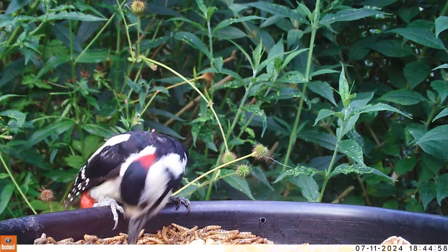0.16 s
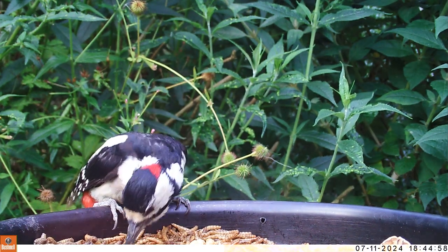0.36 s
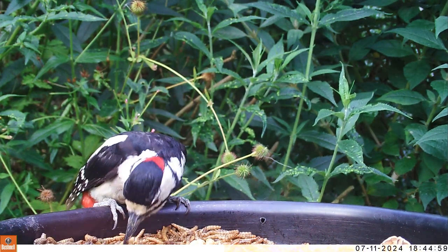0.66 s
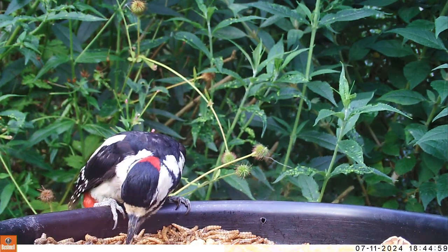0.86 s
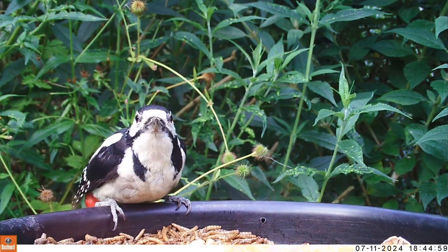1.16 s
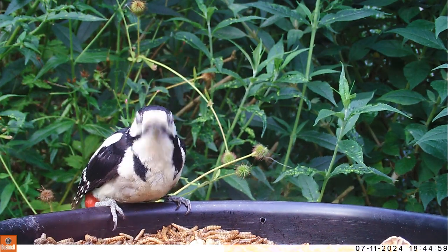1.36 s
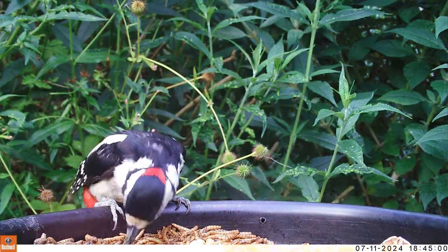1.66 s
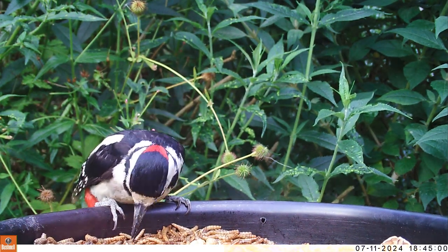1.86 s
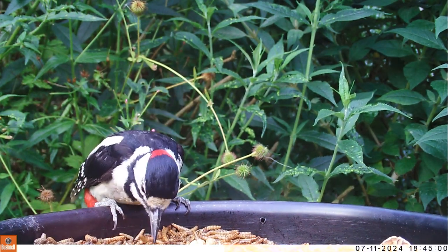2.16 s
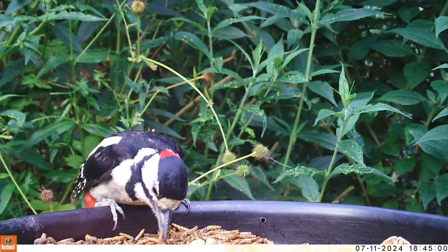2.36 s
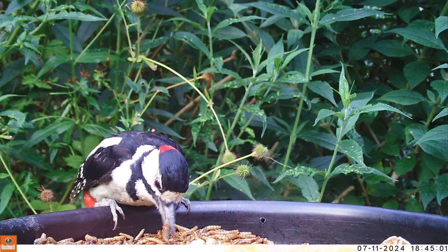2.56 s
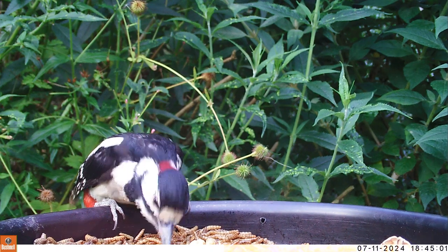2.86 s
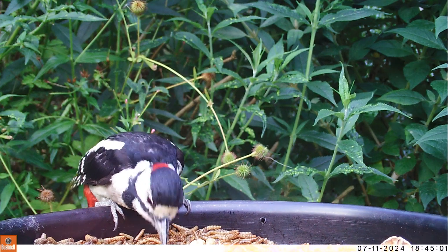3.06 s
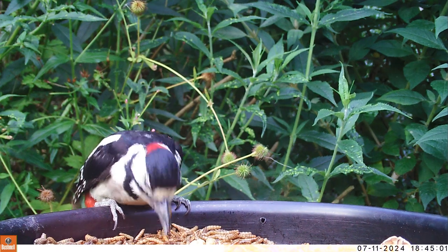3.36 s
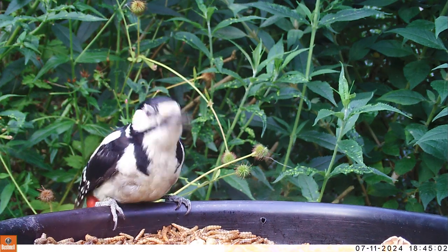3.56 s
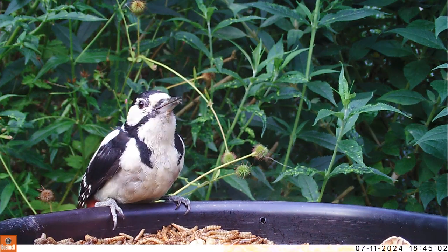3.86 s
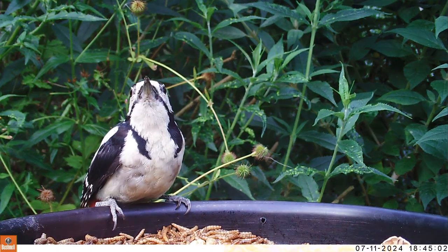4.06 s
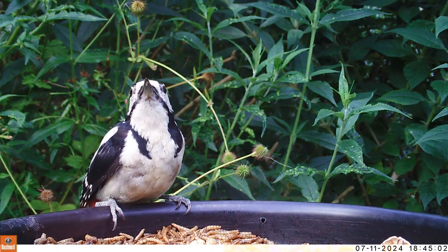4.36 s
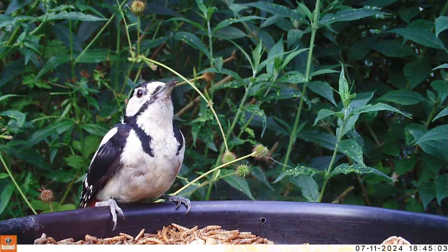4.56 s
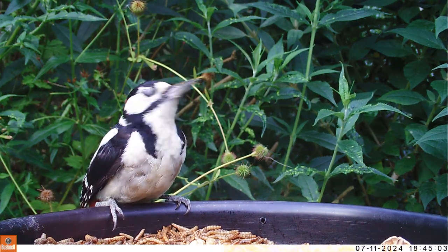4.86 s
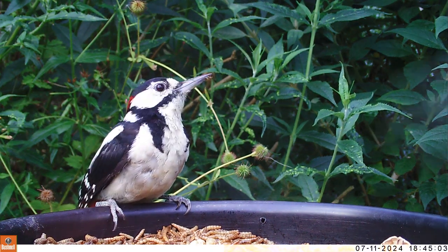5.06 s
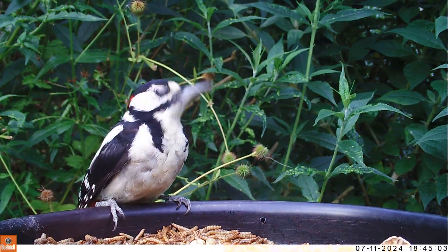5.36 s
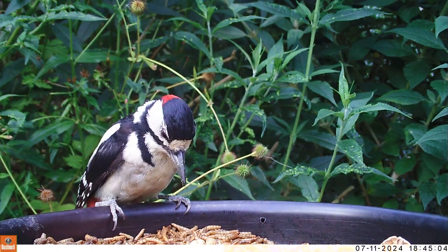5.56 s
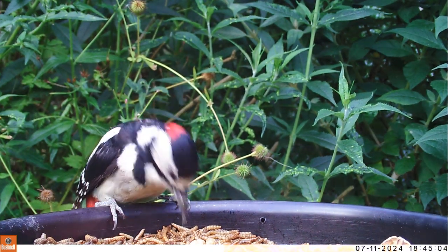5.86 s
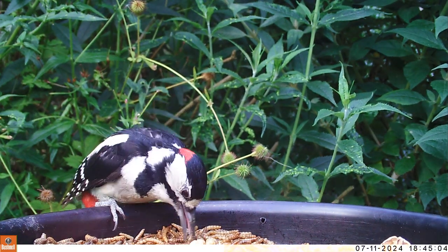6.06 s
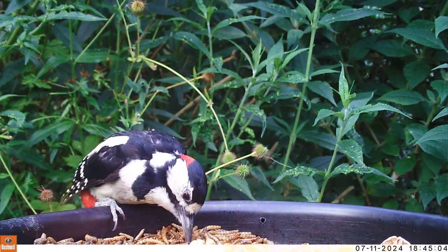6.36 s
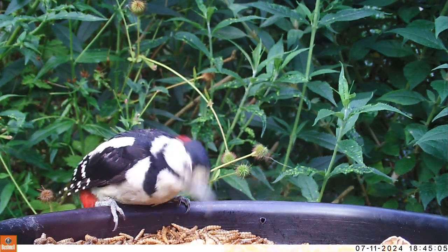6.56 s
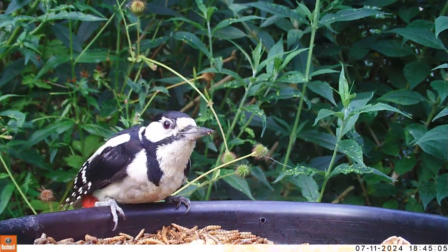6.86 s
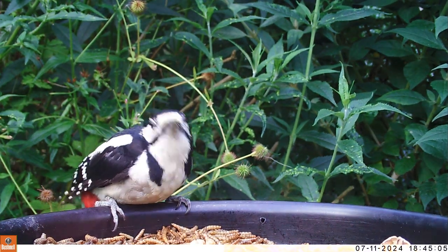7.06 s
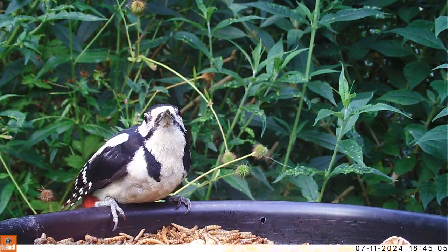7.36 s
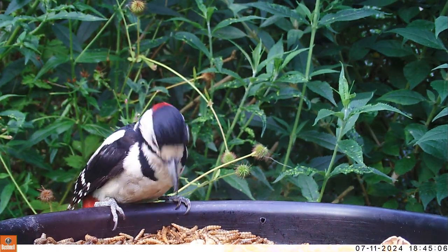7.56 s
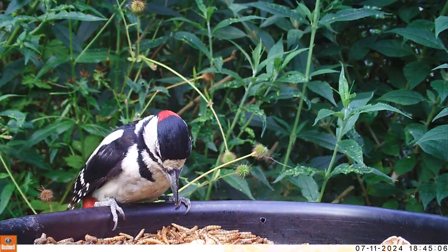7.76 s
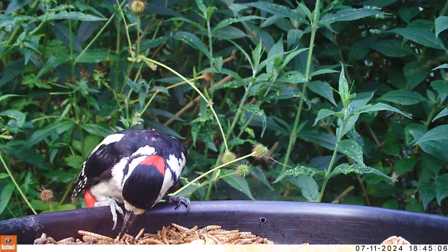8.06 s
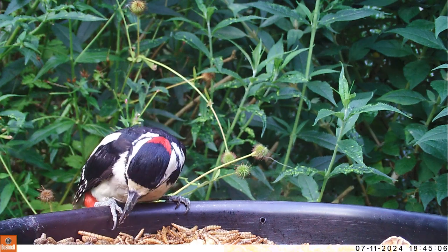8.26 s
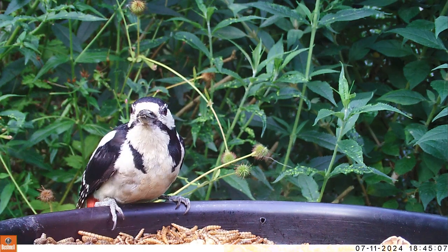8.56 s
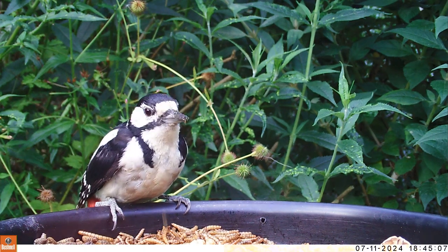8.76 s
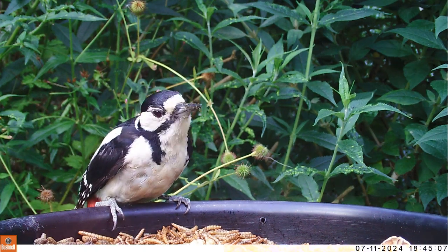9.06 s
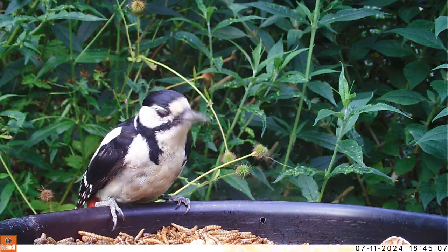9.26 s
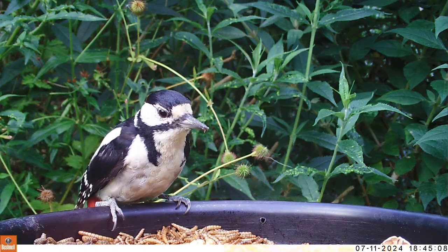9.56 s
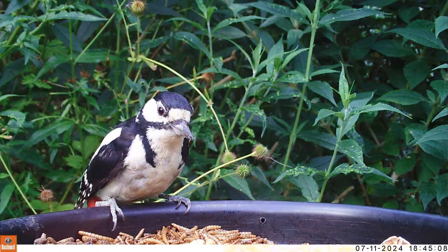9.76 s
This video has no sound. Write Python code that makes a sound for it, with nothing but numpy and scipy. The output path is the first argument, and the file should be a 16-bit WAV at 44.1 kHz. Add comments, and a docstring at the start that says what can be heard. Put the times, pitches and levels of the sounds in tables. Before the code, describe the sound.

A steady low outdoor rumble with faint hiss runs throughout. In the first second, right at the microphone, a woodpecker pecks and crunches dried mealworms in a plastic tray, and the feeder gives several soft, deep thumps. Feathers and claws rustle until about 1.5 seconds, and a distant songbird gives a few faint calls. Sparse light pecks and quiet rummaging follow until about 3.4 seconds. After a lull, rustling and thumps return near 4.8 seconds, and from 5.1 to 5.6 comes a quick flurry of knocks and brittle snaps, some briefly ringing the tray floor. Lighter pecks follow, with another sharp tray tap at 6.6 and a single knock at 8. From about 7.3 seconds to the end near 10, a small songbird sings further off in the bushes: four soft buzzes, then louder thin, high whistles and buzzy trills with a slight echo.

```python
"""A woodpecker picks dried mealworms from a plastic feeding tray, right at the microphone of a small
camera fixed to it. Its bill knocks, crunches the brittle food and now and then rings the tray floor.
Just as close, feathers and claws rustle, and the feeder thumps softly as the bird shifts its weight.
Further off among the bushes a small songbird whistles and buzzes, over a low outdoor rumble."""
import sys
import numpy as np
from scipy import signal
from scipy.fft import rfft, irfft
from scipy.io import wavfile

SR = 44100
rng = np.random.default_rng(int(sys.argv[2]) if len(sys.argv) > 2 else 0)


def unload_audio(sound):
    """Save the sound as a 16-bit wav file, at the path given as the first command line argument."""
    columns = np.transpose(np.atleast_2d(sound))
    # keep every value between -1 and 1, then stretch to whole-number steps
    steps = np.round(np.clip(columns, -1, 1) * 32767)
    wavfile.write(sys.argv[1], SR, steps.astype(np.int16))


N = 437031


# Pecks right at the microphone: start_s, length_s, level_db, crunch_relative_db, snap_relative_db
PECKS = [(0.318, .002, -48.5, -10, -6), (0.385, 0.032, -51.5, -3, -6), (0.398, 0.012, -46, -4.5, -5.5),
         (0.41, 0.015, -52, 5, -12), (0.502, 0.018, -56, -2, -6.5), (0.819, 0.0049, -66, -2, -10),
         (1.76, 0.0031, -47, -24, -11.5), (2.079, .003, -62, -8.5, -6), (2.104, .003, -60.5, -11, -10),
         (2.207, 0.0023, -51.5, -6.5, -33.5), (2.514, .003, -64.5, -4, -19), (2.95, 0.005, -58, -4, -10),
         (3.106, 0.0095, -57, -2.5, -11.5), (3.29, 0.0044, -64.5, -19, -13),
         (4.839, 0.0058, -59, -18, -9.5), (5.129, 0.00058, -44, -11, -14), (5.221, 0.0085, -48.5, -3, 0.5),
         (5.263, 0.0082, -45.5, -7, -2), (5.27, 0.0042, -45, -1, -16), (5.33, .0033, -52, -0.5, 3),
         (5.342, 0.0091, -49.5, -0.5, 1.5), (5.364, 0.0067, -43.5, -8.5, -6),
         (5.393, 0.0027, -41, -5.5, -7), (5.4, 0.0051, -50.5, -3.5, -1), (5.477, 0.009, -62.5, 0, 0.5),
         (5.545, 0.0036, -37.5, -16, -13), (5.562, .0066, -58.5, 3.5, -1), (5.58, 0.0045, -57.5, -3, 3),
         (5.592, 0.0026, -56, -5, -5), (5.628, 0.0019, -61.5, -5, 2.5), (6.014, 0.026, -61.5, -6.5, -11),
         (6.065, 0.0048, -61, 1, -9), (6.396, 0.0024, -43, -33.5, -20), (6.437, .003, -58.5, -20, -21),
         (6.57, 0.00212, -55.5, -7, -8), (6.635, 0.0079, -47, 0.5, -2.5),
         (8.044, 0.0026, -43.5, -28, -13.5), (9.055, 0.0025, -67, -6, 1)]

def pecks(bare_below_db=-20, graze_lead_s=0.01):
    """The bill strikes the heap; where it catches little food, a light graze comes before the knock."""
    out = np.zeros(N)
    for start, length, db, crunch_db, snap_db in PECKS:
        add(out, start, bill_contact(length, db, crunch_db, snap_db))
        if crunch_db < bare_below_db:
            add(out, start - graze_lead_s, bill_contact(length, db - 11, crunch_db=-5.5, snap_db=-6))
    return out


# Spectra of the bill's hard knock, the heap's dull crunch and the food's snap: frequency_hz, gain_db
KNOCK_SPECTRUM = [(1500, -33.5), (2500, -23.5), (3100, -15), (3650, -6), (4100, 0), (4500, -12.5),
                  (5100, -23.5), (6500, -37)]
CRUNCH_SPECTRUM = [(400, -28), (800, -12.5), (1300, -8), (1620, -1.5), (1820, -0.5), (2000, -5.5),
                   (2250, -4), (2600, 6.5), (3000, 7), (3600, -11.5), (5000, -37)]
SNAP_SPECTRUM = [(3500, -46), (5200, -10.5), (6100, -7), (7000, 3), (7600, 2), (8200, -4), (9300, -0.5),
                 (10300, -6), (11700, 0), (12600, -9), (14000, -4.5)]

def bill_contact(length, db, crunch_db, snap_db, grit=0.63, settle_s=0.025, crisp_db=-8, size=4096):
    """A brief run of fractures under the bill drives a hard knock, a dull crunch and a bright snap."""
    t = np.arange(size) / SR
    # softer food snaps less and knocks a little lower
    softening = np.exp(0.0034 * min(snap_db - crisp_db, 0))
    knock = [(hz * softening, gain) for hz, gain in KNOCK_SPECTRUM]
    # the food gives way while the bill presses; longer pushes die away more slowly
    rise = np.minimum(t / (0.16 * length), 1)
    press = np.exp(-np.maximum(t - 0.7 * length, 0) / (0.0011 + 0.3 * length))
    loose_pieces = amp(-22) * np.exp(-t / settle_s)
    force = rise * (press + loose_pieces)
    fractures = force * rng.standard_normal(size) * np.exp(grit * wander(size, 1900))
    out = 0
    for spectrum, gain_db in ((knock, 0), (CRUNCH_SPECTRUM, crunch_db - 1), (SNAP_SPECTRUM, snap_db)):
        sound = signal.fftconvolve(fractures, response(spectrum))
        out += amp(gain_db) * unit_energy(sound)
    return amp(db) * np.sqrt(length * SR) * out


# The bill rummaging in the heap, close up: start_s, length_s, gap_s, level_db
STIRS = [(0.279, .11, 0.092, -66.5), (0.426, .065, .011, -63.5), (2.224, .03, .02, -73),
         (2.663, .7, .11, -77), (5.23, .02, .012, -63), (5.297, .03, .012, -59), (5.824, .06, 0.022, -68),
         (6.585, .02, 0.018, -64)]

def stirs(contact_s=0.0066, jitter_s=0.0015, spread_db=3, max_contacts=8):
    """Small contacts follow each other unevenly while the bill stirs the mealworms."""
    out = np.zeros(N)
    for start, length, gap, db in STIRS:
        for k, (late, strength) in enumerate(rng.standard_normal((max_contacts, 2))):
            sound = bill_contact(contact_s, db + spread_db * strength, crunch_db=1, snap_db=-5)
            if k * gap < length:
                add(out, start + k * gap + jitter_s * late, sound)
    return out


# Modes of the plastic tray: pitch_hz, gain_db, t60_s
TRAY_MODES = [(880, 0, 0.034), (1100, -3, 0.039), (1560, -4, 0.055), (1690, -2, 0.045), (2300, -15, .025),
              (2663, -16, 0.025), (2930, 0, .022), (4540, -5, 0.012)]
# The bill striking through to the tray floor: start_s, peak_db
TRAY_TAPS = [(0.403, -61), (5.226, -44.5), (5.272, -52), (5.395, -54), (5.546, -38.5), (5.563, -49),
             (6.6396, -40.5)]

def tray_taps(spread_db=2):
    """The tray rings briefly; each spot struck excites its modes in other proportions."""
    t, out = np.arange(SR // 10) / SR, np.zeros(N)
    modes = np.array([amp(db - 60 * t / t60) * np.sin(2 * np.pi * hz * t) for hz, db, t60 in TRAY_MODES])
    for start, db in TRAY_TAPS:
        signs = rng.choice([-1, 1], len(modes))
        weights = signs * amp(spread_db * rng.standard_normal(len(modes)))
        ring = weights @ modes
        add(out, start, amp(db) * ring / abs(ring).max())
    return out


# Feathers and claws on the tray, beside the microphone: start_s, length_s, relative_db
RUSTLES = [(0.03, 0.097, -73.5), (0.153, 0.51, -69.5), (0.875, 0.19, -67.5), (0.997, 0.095, -64),
           (1.128, 0.17, -64.5), (1.313, 0.13, -68), (1.436, .12, -69.5), (2.996, 0.195, -77),
           (4.753, 0.205, -70.5), (4.867, 0.18, -67), (5.085, 0.087, -62), (5.212, .18, -62),
           (5.476, 0.09, -62), (5.93, 0.2, -73), (6.35, 0.33, -76)]
# Spectrum of that brushing: frequency_hz, gain_db
RUSTLE_SPECTRUM = [(300, -15), (900, -8), (1600, -11), (2200, -14), (3100, -13), (3950, 2.5), (4500, -6.5),
                   (5400, -17.5), (7500, -22), (9000, -18), (10300, -19.5), (11900, -10.5), (14000, -29)]

def rustle(ticks_per_s=4500, stroke_hz=36, scratch_hz=200, attack_s=0.019, release_s=0.05, gain_db=1):
    """Feathers and claws brush in short overlapping strokes, each a clump of tiny ticks."""
    t, power = np.arange(N) / SR, np.zeros(N)
    for start, length, db in RUSTLES:
        ramps = np.minimum((t - start) / attack_s, (start + length - t) / release_s)
        power += amp(db) ** 2 * np.clip(ramps, 0, 1)
    pressure = amp(4 * wander(N, stroke_hz) + 2 * wander(N, scratch_hz))
    ticks = sparse_noise(N, ticks_per_s) * pressure
    brushing = signal.oaconvolve(ticks, response(RUSTLE_SPECTRUM))[:N]
    return amp(gain_db) * np.sqrt(power) * unit_rms(brushing)


# Soft thumps of the feeder that carries the microphone: start_s, level_db, sway_hz
THUMPS = [(.215, -32.5, 28), (.295, -35, 22), (0.425, -24, 42), (0.456, -27, 16.4), (.488, -35, 43),
          (4.929, -41.5, 26), (5.097, -29.5, 28.4), (5.33, -37, 22), (5.479, -32.5, 21.3)]

def feeder_thumps(shudder=0.14, shudder_hz=130, unsteadiness=0.13, swell_cycles=0.62):
    """As the bird shifts its weight, the feeder sways unevenly for a cycle or two and shudders."""
    t, out = np.arange(SR // 2) / SR, np.zeros(N)
    for start, db, hz in THUMPS:
        cycles = np.cumsum(hz * (1 + unsteadiness * wander(len(t), 60))) / SR
        sway = np.sin(2 * np.pi * cycles) + shudder * wander(len(t), shudder_hz)
        age = t * hz / swell_cycles
        add(out, start, amp(db) * age * np.exp(1 - age) * sway)
    return out


# Clear whistles and trilled buzzes, off in the bushes: start_s, length_s, onset_hz, held_hz, source_db
WHISTLES = [(0.524, .022, 7700, 7220, -72), (.525, .085, 3300, 2050, -75), (0.857, .1, 2710, 2950, -69.5),
            (3.491, 0.039, 7760, 7120, -72.5), (7.264, 0.051, 5674, 5630, -76),
            (7.954, 0.16, 5530, 4420, -63.5), (8.175, .13, 4390, 4099, -54.5),
            (8.423, 0.19, 7200, 6820, -75.5), (8.656, .14, 4880, 4510, -57), (8.795, .11, 5840, 5541, -66),
            (9.266, 0.17, 3280, 3638, -61), (9.612, .11, 6300, 5730, -69)]
BUZZES = [(8.336, 0.12, 4210, 4085, -62), (8.877, 0.092, 5200, 4280, -62.5),
          (9.182, 0.078, 7250, 6900, -75.5), (9.49, .1, 8200, 7850, -80), (9.761, .097, 6520, 4260, -61),
          (9.84, .09, 6470, 4408, -62)]

def songbird(song_start_s=7.345, gap_s=0.15):
    """A few stray calls, then a song: four soft buzzes that break into whistles and louder buzzes."""
    out = np.zeros(N)
    for k in range(4):
        soft_buzz = song_note(length=0.07, onset_hz=5500, held_hz=4400, db=-73, buzzing=True)
        add(out, song_start_s + k * gap_s, soft_buzz)
    for notes, buzzing in ((BUZZES, True), (WHISTLES, False)):
        for start, *shape in notes:
            add(out, start, song_note(*shape, buzzing))
    return out


def song_note(length, onset_hz, held_hz, db, buzzing, trill_hz=95, quiver_hz=28.1, db_per_octave=-18):
    """A thin whistle slides onto a held pitch; a wide, fast trill turns it into a buzz."""
    progress = np.linspace(0, 1, int(length * SR))
    trill_rate = trill_hz * (1 + 0.28 * wander(len(progress), 54))
    trill = np.sin(2 * np.pi * np.cumsum(trill_rate) / SR)
    slide_share = 0.32 if buzzing else 0.17
    glide_hz = held_hz + (onset_hz - held_hz) * np.exp(-progress / slide_share)
    # a buzz's trill narrows as the note settles; a whistle barely quivers
    depth_hz = 330 + 0.62 * abs(glide_hz - held_hz) if buzzing else quiver_hz
    hz = glide_hz * (1 + 0.0033 * wander(len(progress), 110)) + depth_hz * trill
    # the voice is strongest at the bottom of each sweep
    voice = amp(db_per_octave * np.log2(hz / held_hz)) * np.sin(2 * np.pi * np.cumsum(hz) / SR)
    effort = np.clip(np.minimum(progress / 0.36, (1 - progress) / 0.11), 0, 1)
    return amp(db) * np.sin(np.pi / 2 * effort) ** 2 * unit_rms(voice)


def garden_echo(song, direct_db=-3, leaves_db=-8, leaves_t60_s=0.35, far_db=-4, far_t60_s=1.0):
    """Nearby leaves scatter the song at once; trees and walls return a longer tail."""
    t = np.arange(SR) / SR
    leaves, far = sparse_noise((2, SR), per_s=2000)
    tail = amp(leaves_db) * unit_energy(leaves * amp(-60 * t / leaves_t60_s))
    tail += amp(far_db) * unit_energy(far * amp(-60 * t / far_t60_s))
    return amp(direct_db) * song + signal.fftconvolve(song, tail)[:N]


# Spectrum of the open air around the feeder: frequency_hz, gain_db
AIR_SPECTRUM = [(12, -4.5), (25, 4), (40, -5), (60, -3.5), (80, -9.5), (115, -12.5), (200, -18), (400, -27),
                (800, -34.5), (1300, -38.5), (2300, -45), (3900, -47.5), (6700, -51), (14000, -52.5)]

def outdoor_air(level_db=-51.5, swell_db=0.52, port_hz=3930, port_half_width_hz=240, port_db=7):
    """Distant rumble and hiss swell very slightly; the microphone opening lifts one band of the hiss."""
    hz = np.fft.rfftfreq(N, 1 / SR)
    port_lift_db = port_db / (1 + ((hz - port_hz) / port_half_width_hz) ** 2)
    shape = amp(gain_at(AIR_SPECTRUM, hz) + port_lift_db)
    noise = irfft(rfft(rng.standard_normal(N)) * shape, N)
    return amp(level_db - swell_db * wander(N, 1.2)) * unit_rms(noise)


def amp(db):
    return 10 ** (np.asarray(db) / 20)


def unit_rms(x):
    return x / np.sqrt(np.mean(x ** 2) + 1e-20)


def unit_energy(x):
    return x / np.linalg.norm(x)


def add(mix, start_s, sound):
    part = mix[max(round(start_s * SR), 0):][:len(sound)]
    part += sound[:len(part)]


def gain_at(spectrum, hz):
    """Gain in dB, on straight lines between the points along a log-frequency axis."""
    points_hz, db = np.transpose(spectrum)
    return np.interp(np.log(hz + 1), np.log(points_hz + 1), db)


def response(spectrum, size=2048):
    """The causal impulse response that has this spectrum."""
    log_gain = np.log(amp(gain_at(spectrum, abs(np.fft.fftfreq(size, 1 / SR)))))
    minimum_phase = np.exp(np.conj(signal.hilbert(log_gain)))
    return np.fft.ifft(minimum_phase).real[:size // 2]


def sparse_noise(shape, per_s):
    """Impulses of random strength at random times."""
    return rng.standard_normal(shape) * (rng.random(shape) < per_s / SR)


def wander(size, hz):
    """A smooth random curve of rms 1 that moves at up to about hz."""
    lowpass = np.exp(-(np.fft.rfftfreq(size, 1 / SR) / hz) ** 2)
    return unit_rms(irfft(rfft(rng.standard_normal(size)) * lowpass, size))


def scene():
    """In mono from the tray: the woodpecker up close, the songbird further off, open air behind."""
    woodpecker = pecks() + stirs() + tray_taps() + rustle() + feeder_thumps()
    return (woodpecker + garden_echo(songbird()) + outdoor_air())[None]


def record(dry):
    """The small camera cuts off the highest treble."""
    band_limit = signal.firwin(401, cutoff=13950, window=("kaiser", 8), fs=SR)
    return signal.oaconvolve(dry, band_limit[None], "same")


dry = scene()
out = record(dry)
unload_audio(out)
```